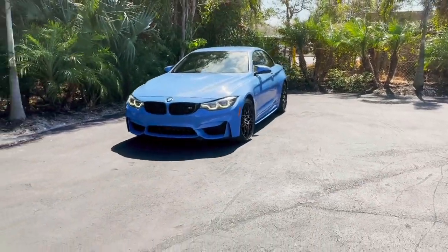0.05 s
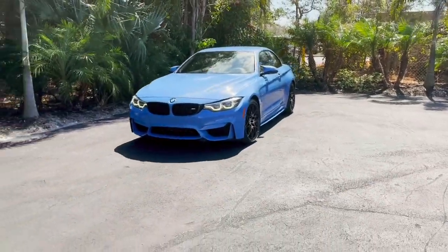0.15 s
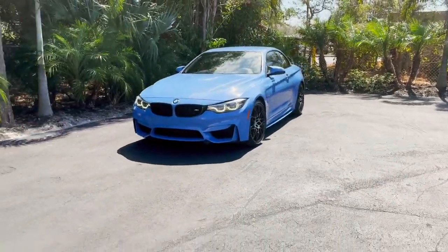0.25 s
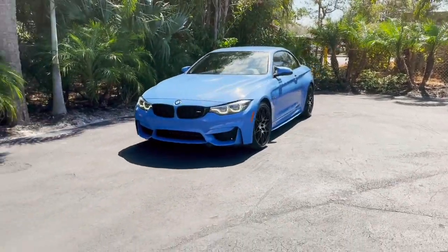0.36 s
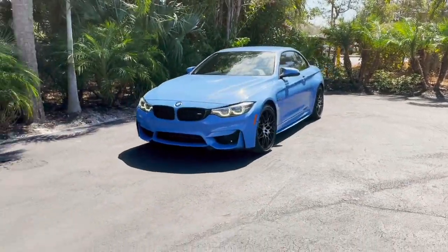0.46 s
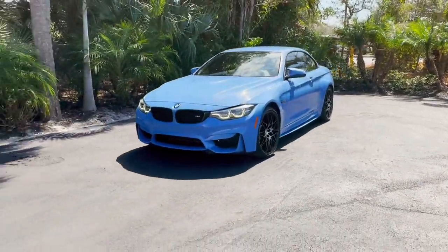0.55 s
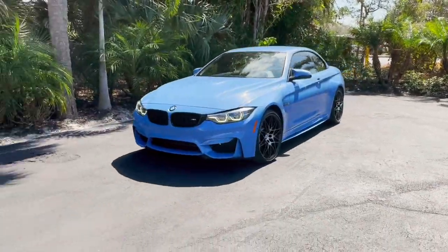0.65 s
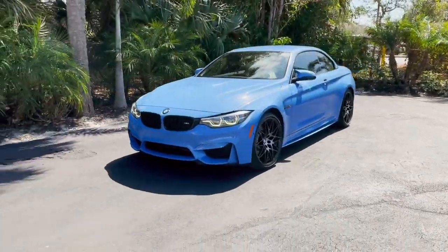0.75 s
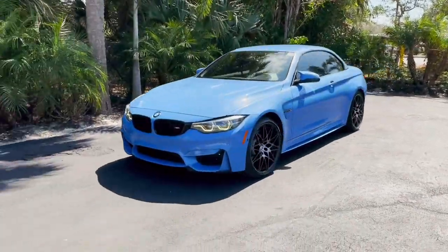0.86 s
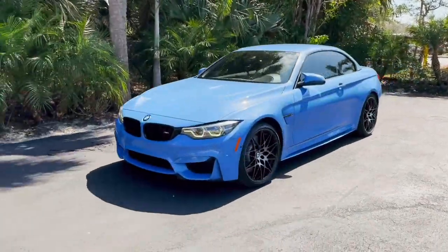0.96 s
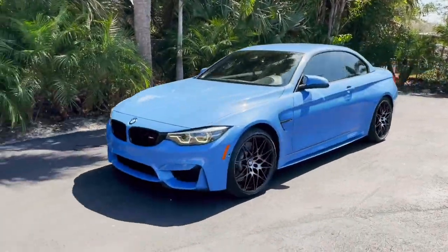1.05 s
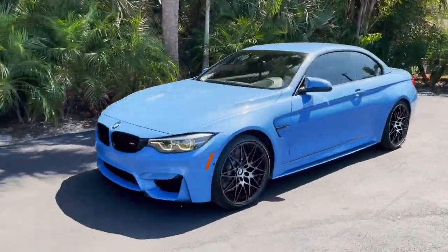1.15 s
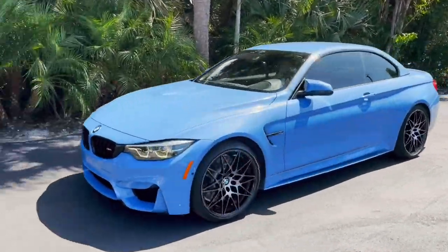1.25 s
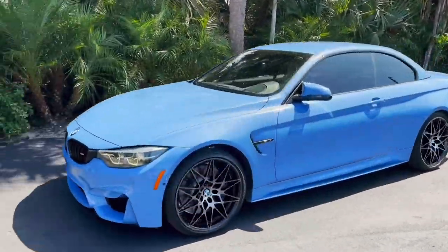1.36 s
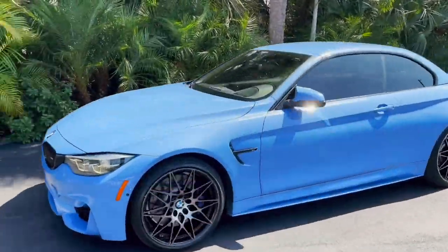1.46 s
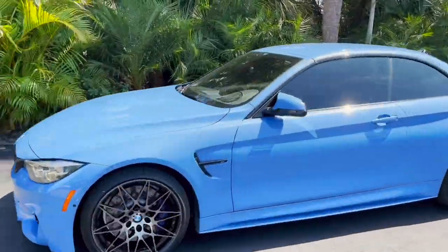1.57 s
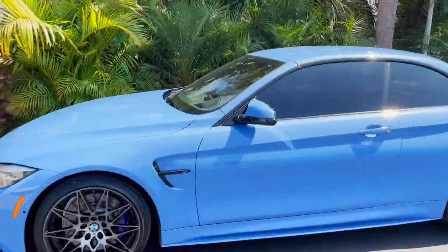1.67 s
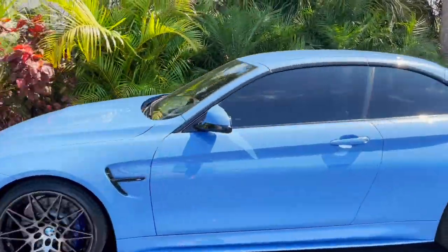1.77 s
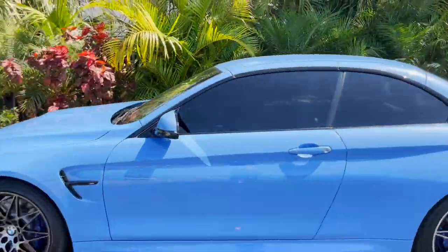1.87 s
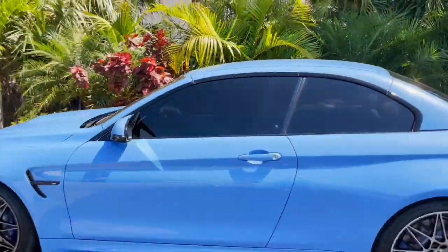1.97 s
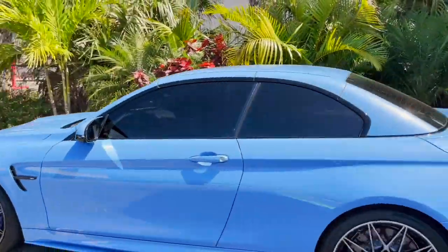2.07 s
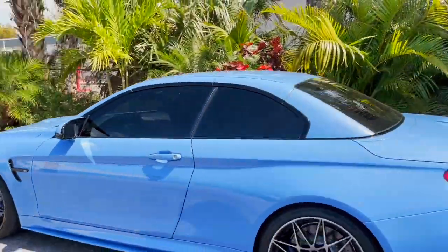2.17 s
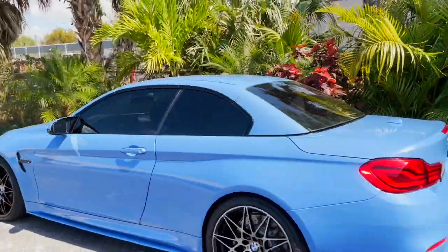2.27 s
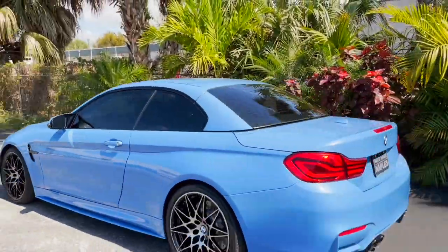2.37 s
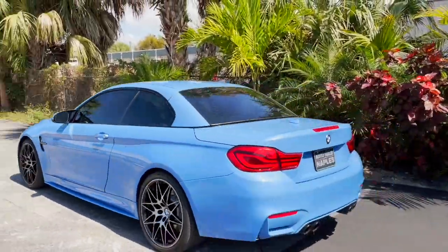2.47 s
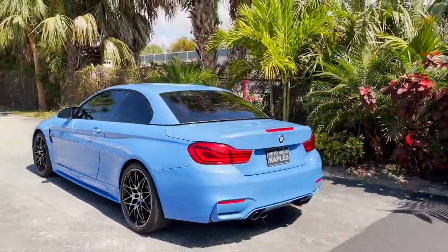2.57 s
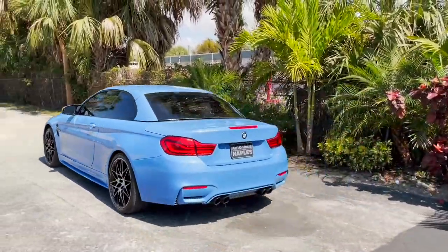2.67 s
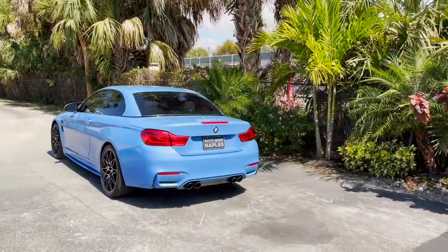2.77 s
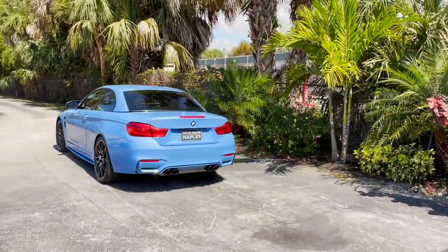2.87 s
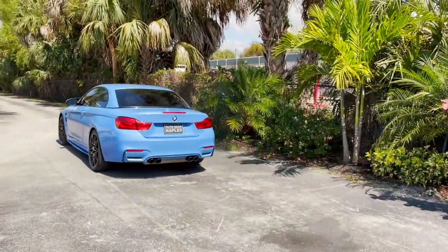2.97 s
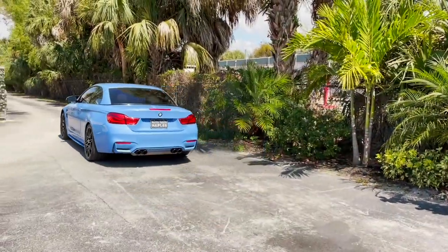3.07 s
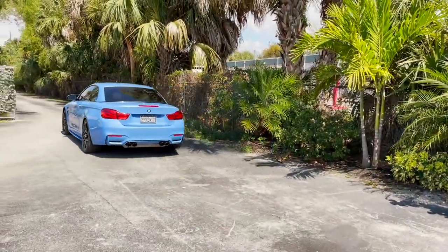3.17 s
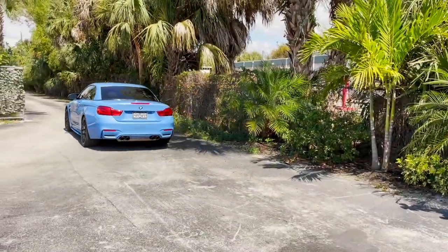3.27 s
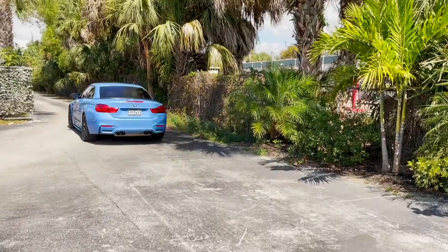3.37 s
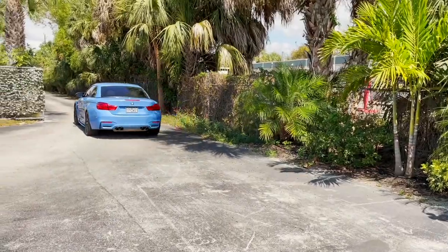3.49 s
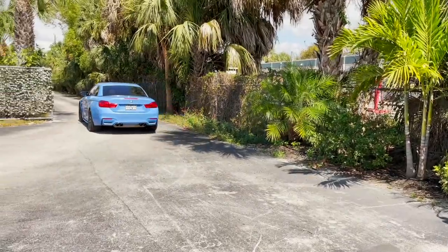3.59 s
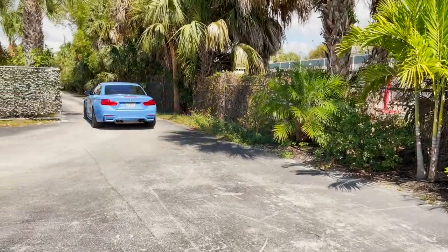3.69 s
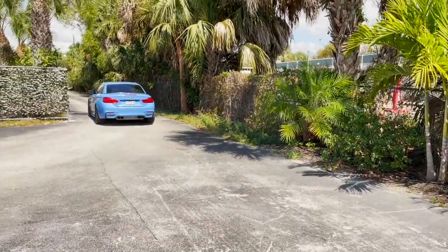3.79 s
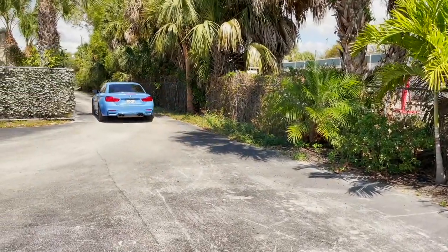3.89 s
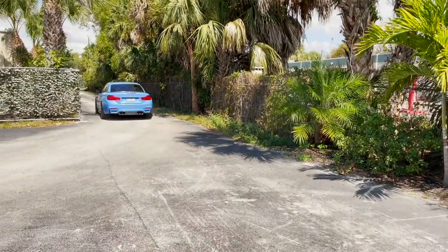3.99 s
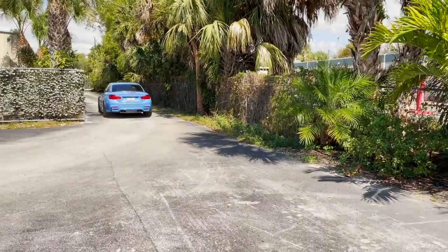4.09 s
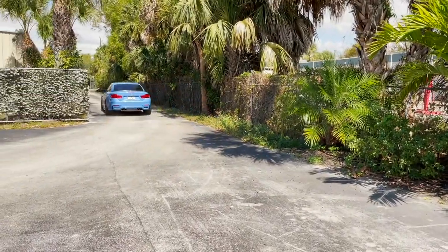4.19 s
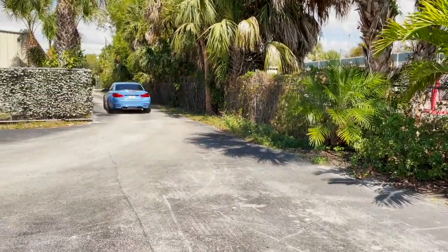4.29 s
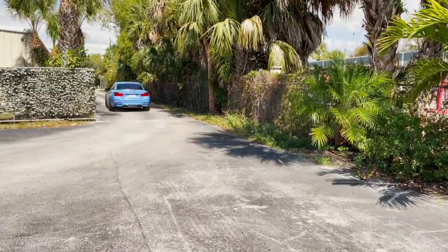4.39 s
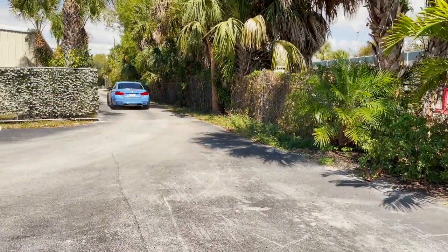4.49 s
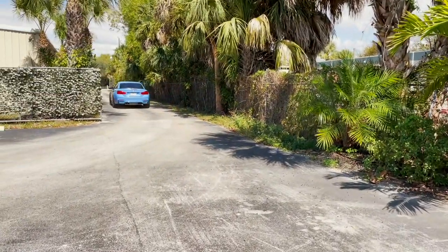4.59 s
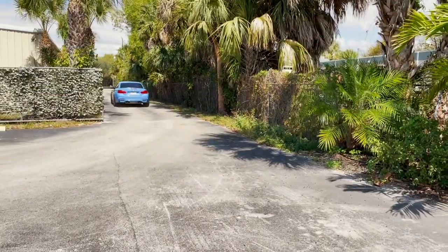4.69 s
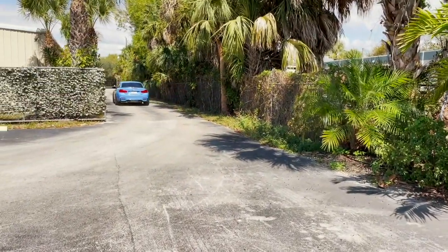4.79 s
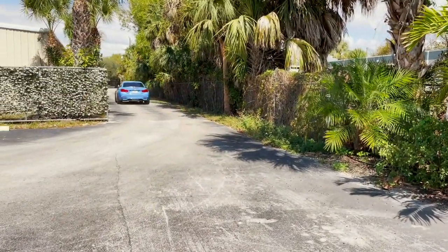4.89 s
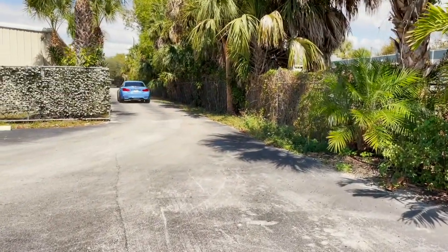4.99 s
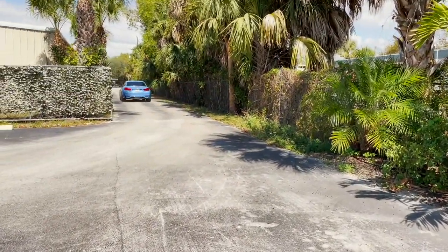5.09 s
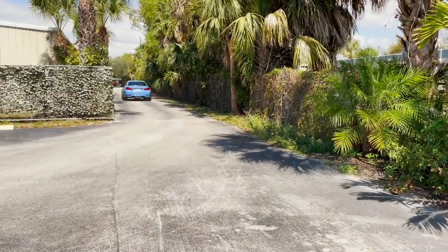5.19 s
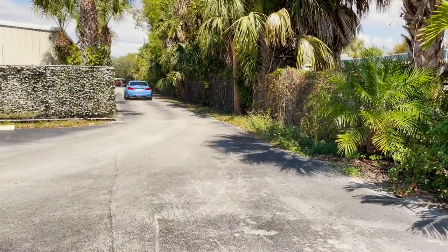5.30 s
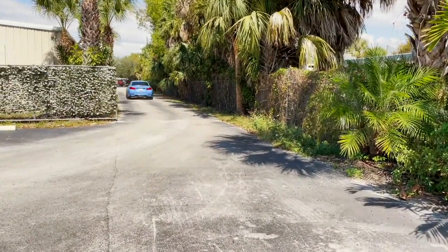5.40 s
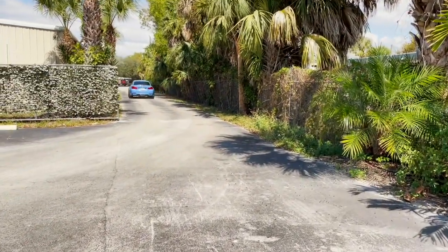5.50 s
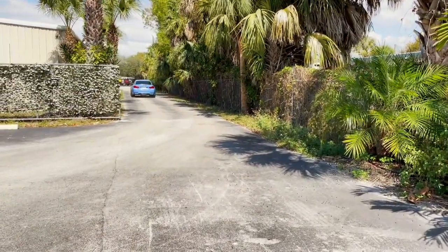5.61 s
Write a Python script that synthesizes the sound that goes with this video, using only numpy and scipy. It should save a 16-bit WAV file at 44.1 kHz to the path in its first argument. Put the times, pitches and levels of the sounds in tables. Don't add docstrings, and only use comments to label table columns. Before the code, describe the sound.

Outdoors on a leafy lane, a handheld phone first catches wind gusts and faint tyre noise. A sports car's engine swells into a low boom with buzzing rasp, passes very close, changes up with a brief dip and bark, then pulls away hard. A second, distant upshift follows, the throttle lifts, and the car fades under renewed wind thumps and a low snap.

```python
import sys
import numpy as np
from scipy import signal
from scipy.fft import rfft, irfft, next_fast_len
from scipy.io import wavfile
from scipy.ndimage import uniform_filter1d

SR = 44100
rng = np.random.default_rng(int(sys.argv[2]) if len(sys.argv) > 2 else 0)


def nominal_scale(level):
    x = np.asarray(level, float) / 20
    return 10 ** x


def pcm_store(signal):
    levels = np.round(np.clip(np.atleast_2d(signal), -1, 1) * 32767)
    wavfile.write(sys.argv[1], SR, levels.astype(np.int16).T)


N = 249165

CLOSEST_M = 2.5
TAIL_TURNS_S, TURN_S = 2.3, .25
FULL_THROTTLE_DB = -27


def evened(x):
    return x / np.sqrt(np.mean(x ** 2) + 1e-20)


def columns(table, at, log=False):
    key, *rest = np.transpose(table)
    bend = np.log1p if log else np.asarray
    return [np.interp(bend(at), bend(key), column) for column in rest]


def ramp(t, start, length):
    return np.clip((t - start) / length, 0, 1)


def swells(rows, t):
    return sum(nominal_scale(db) * np.exp(-((t - s) / half) ** 2) for s, db, half in rows)


def drift(count, fastest_hz, t):
    hz = np.geomspace(fastest_hz / 8, fastest_hz, 12)[:, None, None]
    waves = np.sin(2 * np.pi * (hz * t + rng.random((12, count, 1))))
    return evened(np.sum(waves / np.sqrt(hz), axis=0))


def resonant(modes, hz):
    return sum(nominal_scale(2 * db) / (1 + (2 * (hz - f) / width) ** 2) ** 2 for f, width, db in modes)


def frames():
    return np.arange(N // 256 + 5) * 256 / SR, np.fft.rfftfreq(1024, 1 / SR)[:, None]


def noise(magnitude, same, lead):
    a, b, c, d = rng.standard_normal(magnitude.T.shape + (4,)).T
    same = np.clip(same, 0, 1)
    left = a + 1j * b
    own = c + 1j * d
    right = (same * left + np.sqrt(1 - same ** 2) * own) * np.exp(-1j * lead)
    return signal.istft(np.array([left, right]) * magnitude, nperseg=1024, noverlap=768)[1][:, :N]


def controls(t):
    # t/s, firing rate as if in first gear f/Hz, exhaust pressure level/dB, throttle effort level/dB
    driving = [(0, 81.24, -41.5, -96), (.85, 79.83, -31.5, -46), (1.05, 95.66, -22.5, -43),
               (1.2, 103.5, -18, -37.5), (1.45, 120.9, -21, -32.5), (1.75, 142.1, -23.5, -27.5),
               (2.1, 161.9, -24, -27), (2.33, 164.7, -27.5, -25), (2.38, 164.5, -15.5, -26.5),
               (2.97, 165.6, -17.5, -28.5), (3.14, 173.4, -18, -26), (3.5, 184.2, -17, -27),
               (3.8, 197.1, -21.5, -26.5), (4.16, 206.4, -26, -28.5), (4.55, 204.9, -24, -38.5),
               (4.68, 203.4, -35.5, -49), (5.1, 201, -28, -48.5), (5.65, 197.7, -57, -52.5)]
    # t/s, revs after over revs before, clutch time/s, throttle cut/dB, exhaust bark/dB
    shifts = [
        (2.32, .64, .105, -6.5, 1),
        (4.165, .726, .07, -6, 5.5),
    ]
    # t/s, distance/m
    path = [(0, 4.3), (.75, 5.16), (1.5, 3.06), (2.1, 2.44), (2.5, 3.54), (3, 6.5), (3.5, 10.6),
            (4.25, 10.9), (5.65, 28)]
    recovery = 4.4
    firing_hz, pressure_db, throttle_db = columns(driving, t)
    for s, ratio, clutch_s, cut_db, bark_db in shifts:
        u = np.maximum(t - s, 0) / clutch_s
        firing_hz = firing_hz * (ratio + (1 - ratio) * np.exp(-u ** 2))
        dip = np.exp(-((u - 2) / np.where(u > 2, recovery, .8)) ** 2) * np.minimum(u, 1)
        throttle_db = throttle_db + cut_db * dip
        pressure_db = pressure_db + bark_db * u * np.exp(1 - u)
    return firing_hz, pressure_db, throttle_db, np.maximum(columns(path, t)[0], CLOSEST_M)


def wind():
    # t/s, level/dB, half length/s
    gusts = [(0, -24, 0.19), (0.698, -26.5, 0.11), (1.398, -28, .4), (2.304, -28, 0.48), (2.7, -28, 0.21),
             (4.1, -28.5, 0.24), (4.5, -46, 0.14), (5, -37, 0.29), (5.6, -37.5, .2)]
    # f/Hz, level/dB per Hz
    gust_colour = [(15, -33), (35, 1), (55, 25), (100, 9.5), (160, 4), (280, -4.5), (450, -17), (1500, -86)]
    # t/s, peak level/dB, f/Hz, length/cycles
    thumps = [(0.023, -25, 110, 1.3), (0.219, -14.5, 120, 0.4), (.251, -12.5, 190, 0.59),
              (.632, -25, 400, 1.5), (.638, -23, 250, 1.5), (.788, -24, 420, 1.5), (.792, -21, 270, 1.5),
              (0.811, -35, 90, 1.5), (.89, -22, 151, 1.5), (.93, -22, 274, 1.8), (1.074, -21, 430, 2),
              (0.86, -21, 218, 3.5), (1.075, -14.5, 260, 1.65), (1.255, -19, 229, 1.8),
              (1.335, -21.5, 232, 3.7), (2.204, -7, 94, 1.6), (2.36, -18, 77, 2.4), (4.814, -23, 90, 2.2),
              (4.863, -14.5, 85, 1.7), (4.88, -25, 192, 2.6), (4.95, -28, 45, 1.7), (5.025, -20.5, 80, 1.5),
              (4.08, -22, 48.1, 2.2), (5.6, -24, 48, 1.5), (5.089, -24, 118, 1.8),
              (5.239, -22.5, 90.5, 1.2), (5.361, -23.5, 60.75, 2.3), (5.409, -19.5, 51.4, 3.4),
              (5.521, -23, 129.6, 1.9)]
    calm_db = -38.5
    t, hz = frames()
    lumps_db = 3.1 * drift(1, 12.0, t)
    out = evened(noise(nominal_scale(columns(gust_colour, hz, log=True)[0] + lumps_db), .6, -.3))
    out = out * (nominal_scale(calm_db) + swells(gusts, np.arange(N) / SR))
    around = np.arange(-2000, 2000)
    for s, db, pitch_hz, cycles in thumps:
        u = around / SR * pitch_hz
        push = nominal_scale(db) * np.exp(-(2 * u / cycles) ** 2) * np.cos(2 * np.pi * u - .6)
        both = np.array([push, np.roll(push, -25)])
        at = round(s * SR) + around
        out[:, at[at >= 0]] += both[:, at >= 0]
    return out


def road():
    # level/dB at closest, share of spreading loss, share of throttle, air loss/dB per m, far sounds level/dB
    layers = [
        (-29, 0.24, 0.52, 0.62, -44.5),
        (-28.5, 0.14, 0.5, 0.83, -40),
        (-38.5, 0.93, 0.11, 0.05, -59),
        (-48.5, 0.6, 0.083, 0.8, -70),
    ]
    behind_db = [
        [1.5],
        [0],
        [-1.5],
        [-1.5],
    ]
    # f/Hz, level/dB per Hz
    rumble = [(130, -24), (200, -4), (250, 1), (320, 1.5), (420, -9), (550, -40), (900, -100)]
    roar = [(300, -32), (450, -1), (650, 1.5), (850, 2.5), (1000, 0.5), (1300, -1), (1900, -7),
            (2600, -22.5), (5000, -95)]
    rush = [(1300, -48), (1700, -1), (2300, 1.5), (3000, -8), (4200, -13), (5200, -11.5), (6700, -13),
            (8000, -40), (10500, -73)]
    hiss = [(5000, -56), (6500, -11), (8000, 1.5), (10000, -4.5), (12000, -13.5), (14600, -9.5),
            (15700, -15)]
    # t/s, level/dB, half length/s
    rustles = [(2.45, -61, 0.072), (2.825, -45, 0.015), (3.1, -56, 0.27), (3.48, -53.5, 0.14),
               (3.87, -55, 0.17), (4.2, -64, .12)]
    # f/Hz, width/Hz, level/dB over the roar
    singing = [(1618, 82, 1.5), (1888, 200, -3.5), (1610, 130, -1.5), (1087, 27, 3), (2120, 210, -9),
               (3740, 880, -23), (5499.5, 470, -27.5), (5360, 480, -35), (3080, 1040, -18), (1120, 170, 1)]
    # from t/s, to t/s
    singing_when = [(.2, 1.65), (1.3, 1.95), (2.15, 2.7), (.25, .6), (.3, .9), (3.05, 3.85), (3.4, 4.5),
                    (0, 2.7), (1.7, 2.4), (.9, 1.35)]
    # f/Hz, likeness (0 to 1), lead of the left/radians
    ports = [(60, .9, -.2), (430, .92, -.1), (800, .85, .3), (1700, .65, 1.2), (2300, .55, 1.8),
             (3450, .45, .6), (4300, .55, 0), (5500, .6, 2.6), (6600, .55, .3), (7600, .5, 2),
             (10400, .3, 1.6), (11500, .3, 0)]

    t, hz = frames()
    patches = rng.standard_normal((len(t), len(hz))).T
    patches = evened(uniform_filter1d(uniform_filter1d(patches, 14, 0), 10, 1))
    throttle_db, metres = controls(t)[-2:]
    near_db, spread, effort, air_db, far_db = np.transpose(layers)[:, :, None]
    car_db = near_db - spread * 20 * np.log10(metres / CLOSEST_M)
    car_db = car_db + effort * (throttle_db - FULL_THROTTLE_DB) - air_db * (metres - CLOSEST_M)
    car_db = car_db + np.array(behind_db) * ramp(t, TAIL_TURNS_S, TURN_S)
    leaves = np.array([[0], [0], [0], [1]]) * swells(rustles, t) ** 2
    levels_db = 10 * np.log10(nominal_scale(2 * car_db) + nominal_scale(2 * far_db) + leaves)

    power = 0
    for colour, level_db, trim_db in zip((rumble, roar, rush, hiss), levels_db, (-25.0, -32.0, -30.0, -31.0)):
        power = power + nominal_scale(2 * (columns(colour, hz, log=True)[0] + level_db + trim_db))
    for (start, end), mode in zip(singing_when, singing):
        lasting = np.clip(np.minimum(t - start, end - t) / .15, 0, 1)
        power = power + lasting ** 2 * resonant([mode], hz) * nominal_scale(2 * (levels_db[1] - 27.5))
    return 12 * noise(np.sqrt(power) * nominal_scale(1.18 * patches), *columns(ports, hz, log=True))


def boom_levels(firing_hz, pressure_db, metres, rear):
    # multiple of firing rate, front level/dB, rear level/dB, rear change/dB per doubled distance
    neighbours = [
        (.5, -10, -3.5, -3.),
        (1.5, -7, -3, -7.5),
        (2, -10.5, -18, -1.5),
    ]
    # f/Hz, level/dB
    floor_pan = [(45, -8), (80, 8.5), (105, 8.5), (130, -2), (160, -2), (205, -7), (255, 2.5), (330, -8)]
    idle_hz, idle_lope_db = 90, 17.5
    multiple, front_db, rear_db, fade_db = np.transpose(neighbours)[:, :, None]
    front_db = front_db + columns(floor_pan, multiple * firing_hz, log=True)[0]
    front_db = front_db - columns(floor_pan, firing_hz, log=True)[0]
    front_db = front_db + (multiple > 1.75) * idle_lope_db * ramp(idle_hz, firing_hz, 8)
    rear_db = rear_db + fade_db * np.log2(metres / CLOSEST_M)
    return pressure_db + np.vstack([0 * rear, (1 - rear) * front_db + rear * rear_db])


def engine():
    # f/Hz, width/Hz, level/dB
    bay = [(260, 76, -2.5), (326, 50, -22), (397.4, 32, -2.5), (490, 12, -11), (629, 58, 2),
           (822, 103, 3.5), (1056.5, 160, -15), (1263, 25, -8.5), (1560, 87, -15)]
    # f/Hz, width/Hz, level/dB
    pipe = [(238, 41.5, -4.5), (312, 140, -12.5), (430, 100, -21), (569, 112, -3.5), (695, 74, 1),
            (760, 87, -2), (1023, 190, -18), (1230, 110, -14.5)]
    pipes_align_s, align_s = 3.1, .4
    drone_db, drone_front_db, drone_share, drone_fade_db = 7.5, 5, 0.47, -2

    step = 64
    t = np.arange(N // step + 2) * step / SR
    firing_hz, pressure_db, rasp_db, metres = controls(t)
    rear = ramp(t, TAIL_TURNS_S, TURN_S)
    aligned = ramp(t, pipes_align_s, align_s)
    boom_db = boom_levels(firing_hz, pressure_db, metres, rear)
    lift_db = FULL_THROTTLE_DB - rasp_db
    between_db = -8.5 * rear * (1 - aligned)
    unsteady_db = 2.5 - 1.3 * aligned + .04 * lift_db
    drone_rear_db = drone_db + drone_fade_db * np.log2(metres / CLOSEST_M) + drone_share * lift_db
    drone = drone_front_db * (1 - rear) + rear * drone_rear_db

    sixth = np.arange(13, 110)[:, None]
    hz = sixth * firing_hz / 6
    in_pipe = np.where(sixth % 6 == 0, 0, np.where(sixth % 3 == 0, between_db, -22.))
    in_pipe = in_pipe + (hz < 450) * drone
    in_bay = np.where(sixth % 3 == 0, 0, -12.) + 2 * rng.standard_normal(sixth.shape)
    power = rear * nominal_scale(2 * in_pipe) * resonant(pipe, hz)
    power = power + (1 - rear) * 0.8 * nominal_scale(2 * in_bay) * resonant(bay, hz)
    rasp = np.sqrt(power) * nominal_scale(rasp_db - 2.5 + unsteady_db * drift(len(sixth), 6., t))
    boom = nominal_scale(np.array(boom_db) + .3 * unsteady_db * drift(len(boom_db), 14., t))

    order = np.r_[[6, 3, 9, 12], sixth[:, 0]]
    phase = np.r_[np.full(len(boom), -.8), 2 * np.pi * rng.random(len(sixth))]
    jittered_hz = firing_hz * (1 + .0012 * drift(1, 25., t)[0])
    cycles = np.cumsum(np.interp(np.arange(N), t * SR, jittered_hz)) / (6 * SR)
    at = np.arange(0, N + 4, 4)
    turn = 2 * np.pi * np.interp(at, np.arange(N), cycles)
    lines = []
    for height, k, start in zip(np.vstack([boom, rasp]), order, phase):
        lines.append(np.interp(at, t * SR, height) * np.exp(1j * (k * turn + start)))
    parts = np.array([sum(lines[:len(boom)]), sum(lines[len(boom):])])
    return np.sqrt(2) * signal.resample_poly(parts, up=4, down=1, axis=1)[:, :N]


def lane(x):
    t = np.arange(SR // 4) / SR
    signs = rng.choice([-1., 1.], (2, len(t)))
    taps = signs * (rng.random((2, len(t))) < .04) * nominal_scale(-60 * t / .16) * (t > .004)
    thin = signal.sosfilt(signal.butter(2, 350., "high", fs=SR, output="sos"), x)
    return signal.oaconvolve(thin[None], taps / np.linalg.norm(taps[0]), axes=1)[:, :N]


def ticks():
    # t/s, peak level/dB, f/Hz, width/Hz, length/s
    snaps = [
        (2.8125, -44, 11000, 9000, .05),
        (3.0644, -34, 6800, 1200, .012),
        (3.0655, -32, 2500, 2500, .008),
        (4.8309, -44, 11000, 9000, .002),
        (4.9, -49, 11000, 7000, .002),
        (5.0963, -44, 9000, 2500, .005),
        (5.2515, -22, 1500, 900, .008),
    ]
    out = np.zeros((2, N))
    t = np.arange(2000) / SR
    for (s, db, pitch_hz, width_hz, length), raw in zip(snaps, rng.standard_normal((len(snaps), 2, 2000))):
        edges = np.clip([pitch_hz - width_hz / 2, pitch_hz + width_hz / 2], 100, 20000)
        band = signal.butter(2, edges, "band", fs=SR, output="sos")
        burst = evened(signal.sosfilt(band, raw + raw[0]))
        onset = np.minimum(t * pitch_hz / 2, 1) ** 2
        out[:, round(s * SR):][:, :2000] += nominal_scale(db - 20 * t / length) * burst * onset
    return out


def scene():
    # t/s, left minus right level/dB, lead of the left/radians in the boom, and in the rasp
    bearing = [(0, -0.5, -0.79, 0), (.6, -3.5, -1.2, -0.31), (1.2, -2.5, -.6, -0.3), (2, -2.3, -0.41, -1.2),
               (2.6, -2, 0.031, -0.55), (3.5, -0.4, 0.089, 0.16), (5.65, -1, 0.26, 0.87)]
    pan_db, boom_lead, rasp_lead = columns(bearing, np.arange(N) / SR)
    side = np.array([[.5], [-.5]])
    boom, rasp = engine()
    motor = (boom * np.exp(1j * side * boom_lead) + rasp * np.exp(1j * side * rasp_lead)).real
    echo = nominal_scale(-12) * lane(rasp.real)
    tyres = road()
    low = signal.sosfiltfilt(signal.butter(2, 1300., fs=SR, output="sos"), tyres)
    return (motor + echo + low) * nominal_scale(side * pan_db) + tyres - low + wind() + ticks()


def roll_off(x):
    return signal.sosfilt(signal.butter(12, 16250, fs=SR, output="sos"), x)


def record(dry):
    # f/Hz, level of the sum/dB, level of the difference/dB
    matrix = [(7000, 0, 0), (7600, -4, 1), (8200, -15, 2), (9500, -14.5, 2), (10000, -4, 1), (10600, 0, 0),
              (11300, 2, -5), (12300, 3, -18), (15750, 3, -26), (15850, -60, -60)]
    size = next_fast_len(N)
    both = rfft(np.array([dry[0] + dry[1], dry[0] - dry[1]]) / 2, size)
    gains = nominal_scale(np.array(columns(matrix, np.fft.rfftfreq(size, 1 / SR))))
    total, difference = irfft(both * gains, size)[:, :N]
    bass_cut = signal.butter(2, 36., "high", fs=SR, output="sos")
    mix = signal.sosfiltfilt(bass_cut, [total + difference, total - difference])
    return roll_off(mix)


dry = scene()
out = record(dry)
pcm_store(out)
```